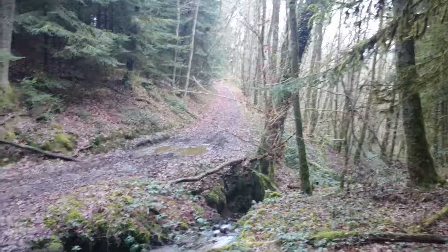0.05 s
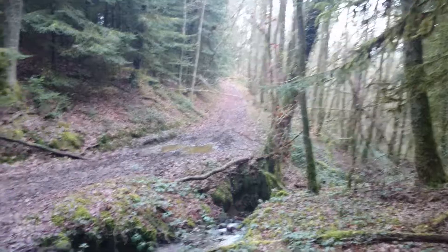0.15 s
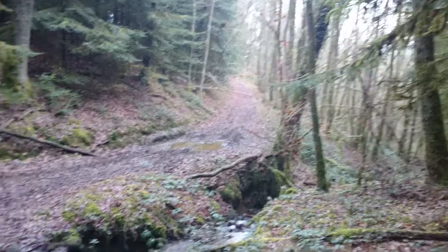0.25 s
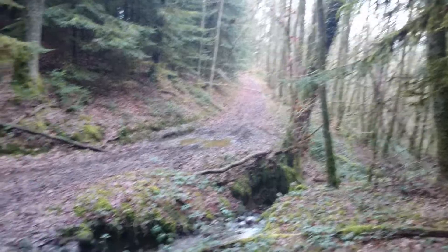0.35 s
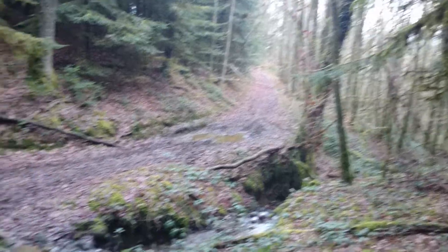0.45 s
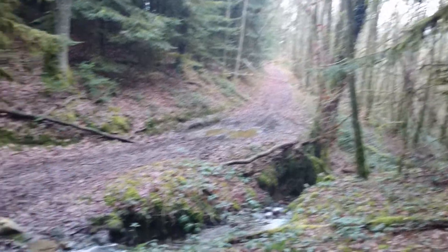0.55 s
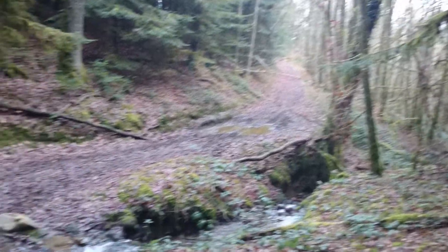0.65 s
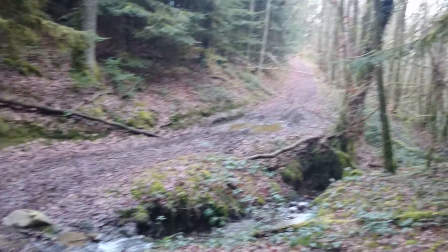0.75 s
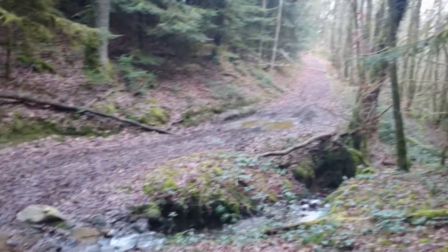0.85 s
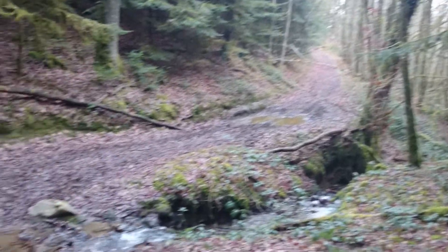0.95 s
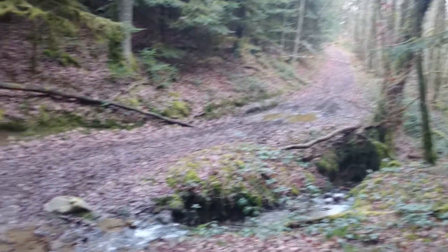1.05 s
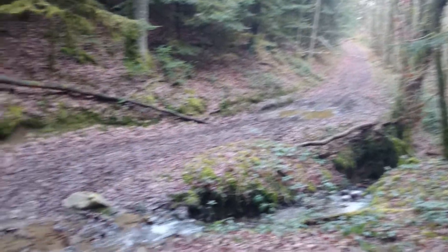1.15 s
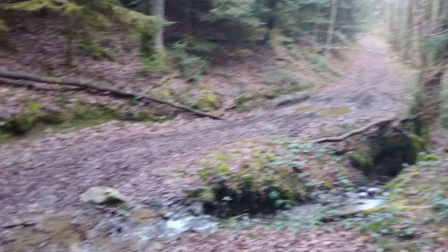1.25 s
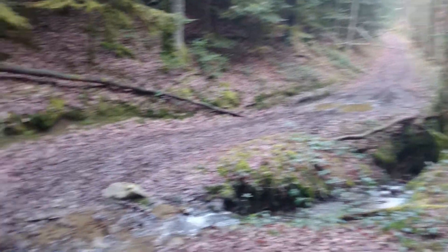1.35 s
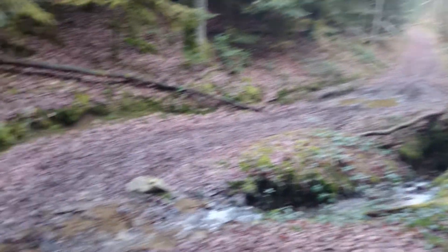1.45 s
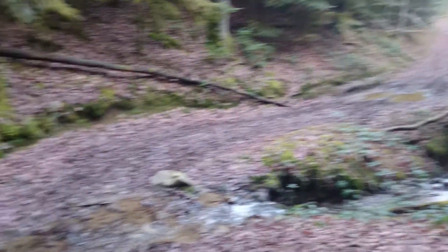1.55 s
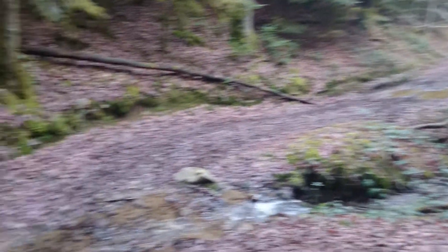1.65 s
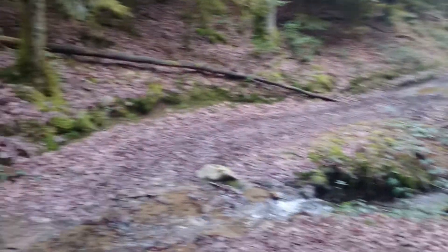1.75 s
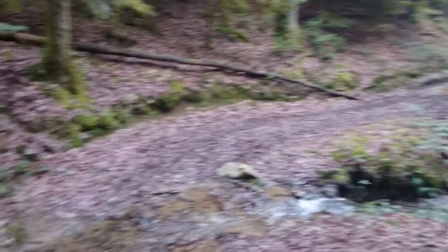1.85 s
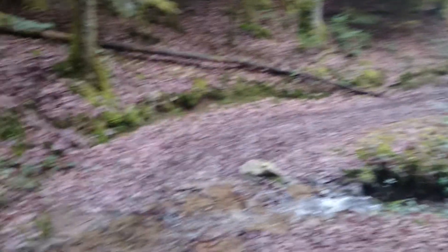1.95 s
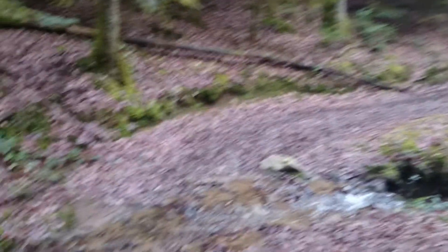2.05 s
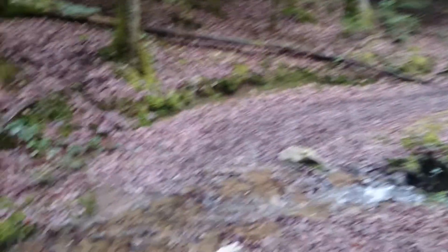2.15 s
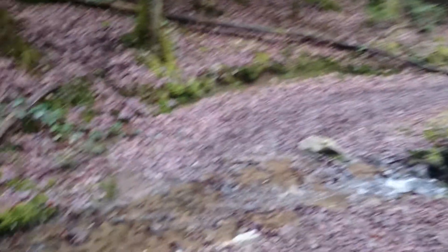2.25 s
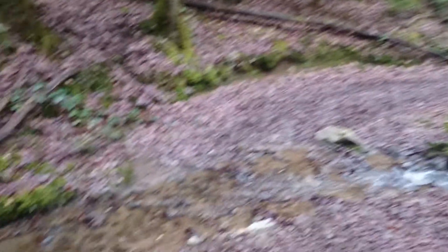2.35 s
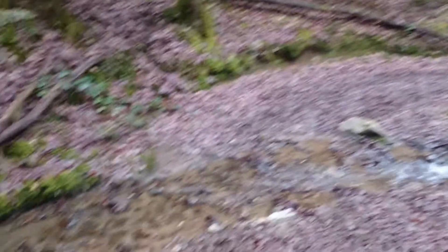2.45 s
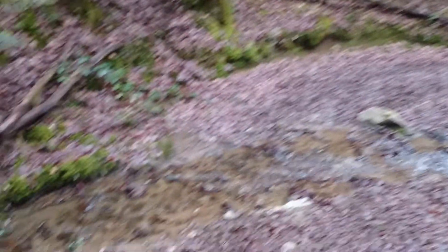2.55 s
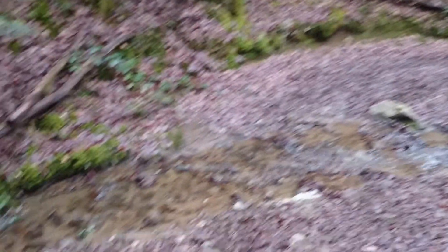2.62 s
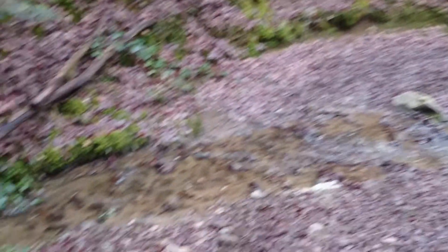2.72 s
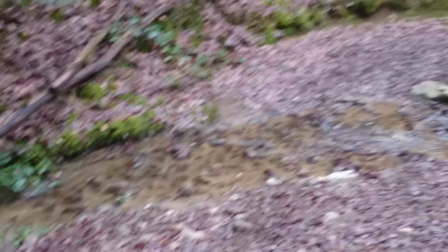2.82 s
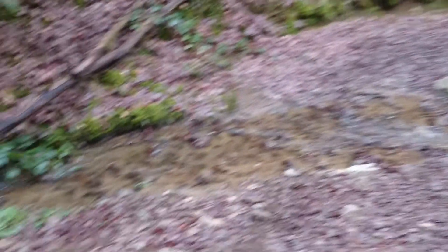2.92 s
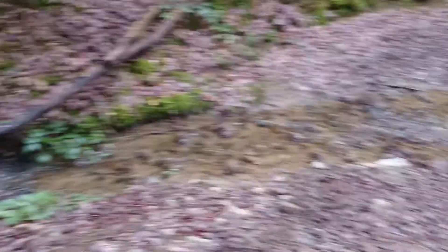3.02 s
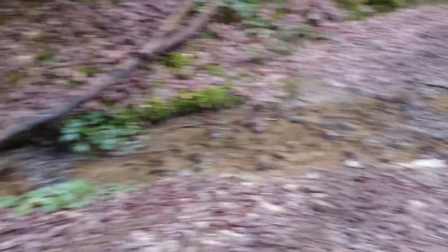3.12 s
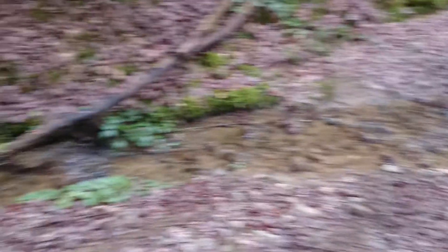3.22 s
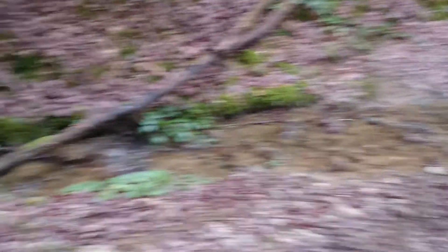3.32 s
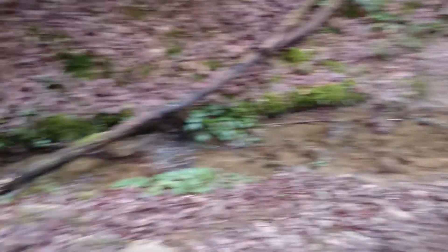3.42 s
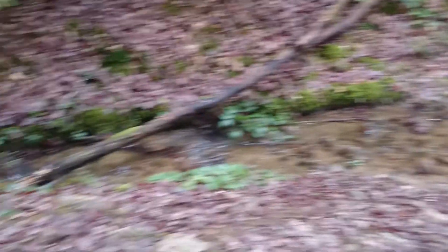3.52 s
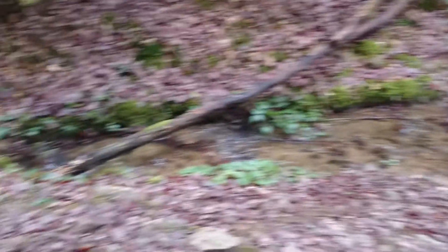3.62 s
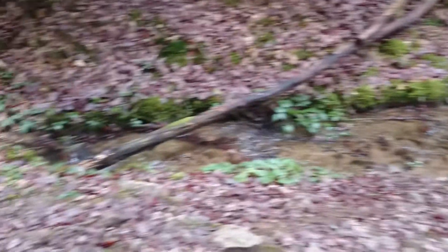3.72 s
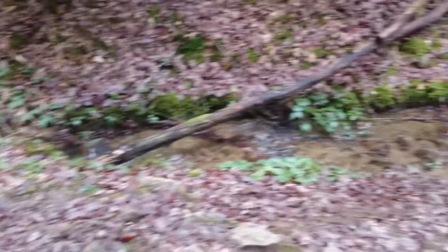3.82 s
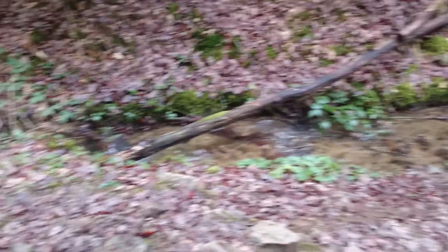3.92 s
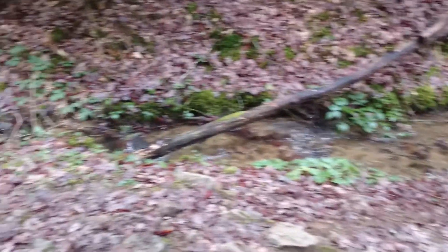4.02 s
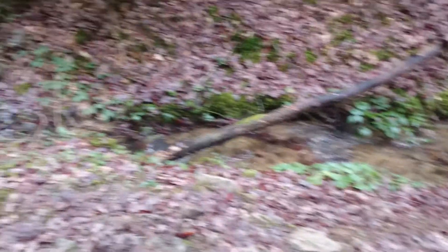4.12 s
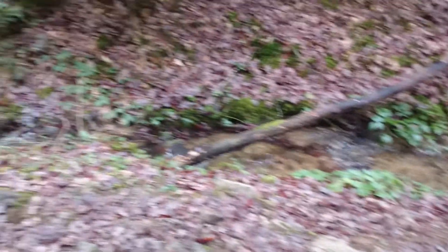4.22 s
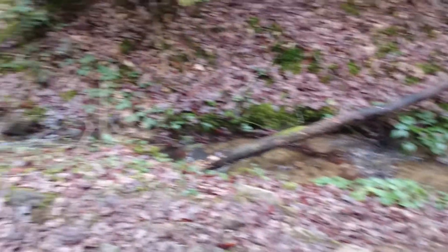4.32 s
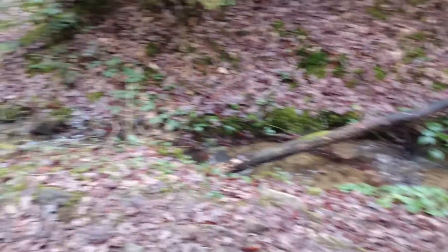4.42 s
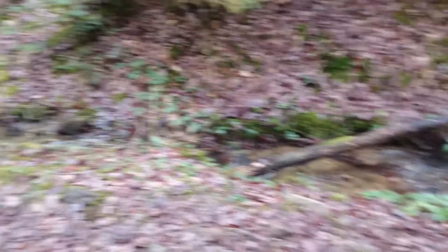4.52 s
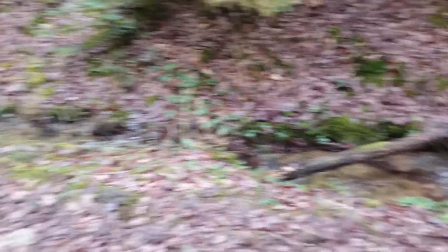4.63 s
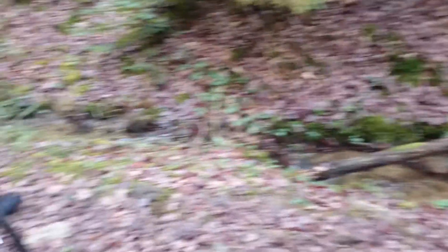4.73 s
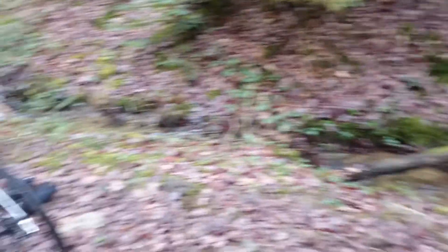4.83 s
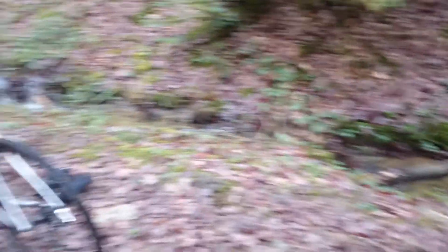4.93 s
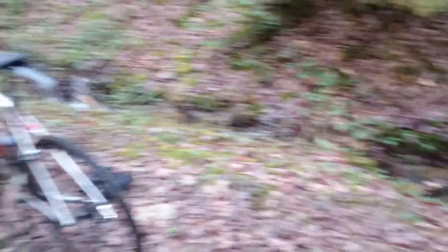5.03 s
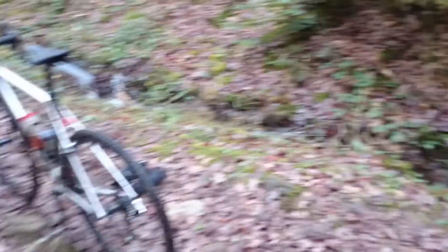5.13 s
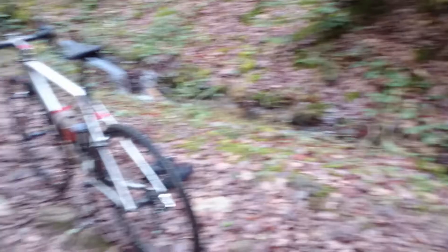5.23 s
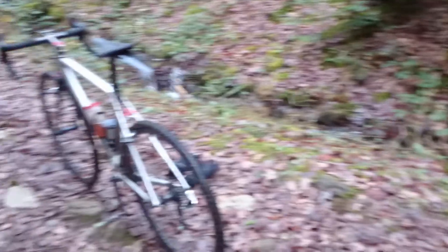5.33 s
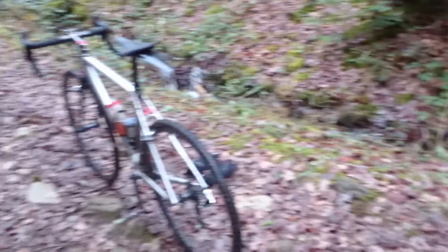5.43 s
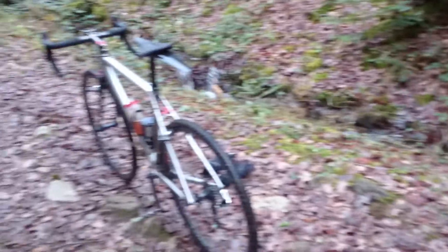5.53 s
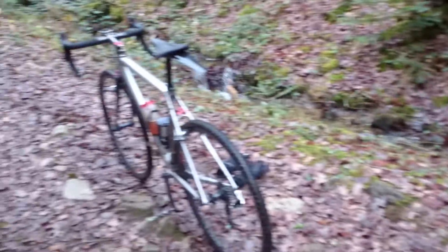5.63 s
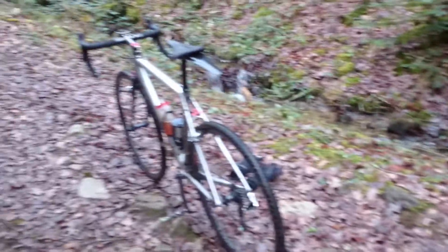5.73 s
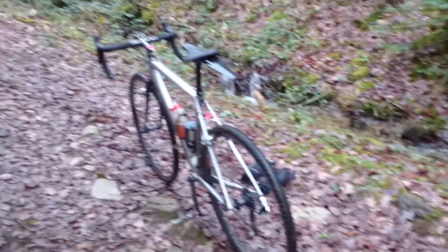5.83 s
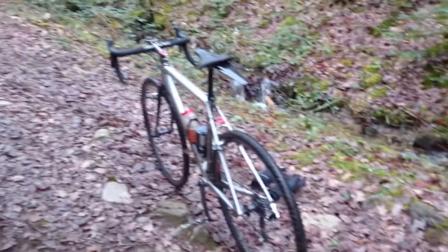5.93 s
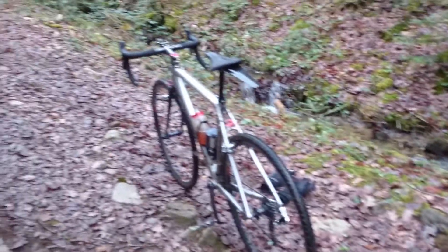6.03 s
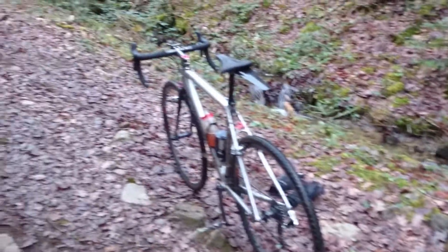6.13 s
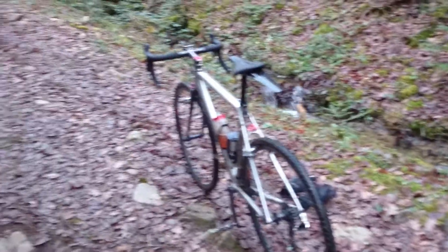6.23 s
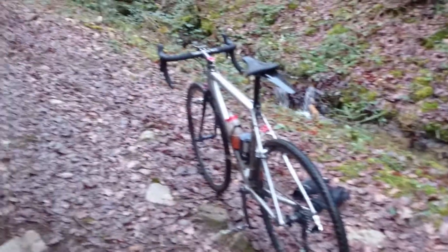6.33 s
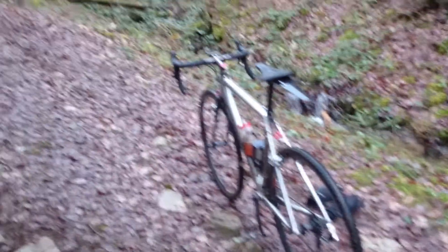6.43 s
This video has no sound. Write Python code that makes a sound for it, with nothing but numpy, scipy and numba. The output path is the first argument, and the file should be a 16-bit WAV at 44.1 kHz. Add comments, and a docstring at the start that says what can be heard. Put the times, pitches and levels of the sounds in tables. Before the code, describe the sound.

A small forest brook starts faint and muffled, suddenly opens up, then splashes and gurgles steadily over stones, close and bright.

```python
"""Forest brook past a turning phone

A small brook runs over stones in a forest, heard at the two ports of a hand-held phone turning slowly left.
Riffles are surging swarms of decaying bubble tones and spray ticks; pool and spout gurgle at their own pitch.
Short bubble clusters make splashes and slaps; long single tones make glugs.
Delayed noise makes a rush from all round. The sound starts faint and opens up after a moment.
"""
import sys
import numpy as np
from scipy import signal
from scipy.fft import rfft, irfft, next_fast_len
from scipy.io import wavfile
from scipy.ndimage import map_coordinates
from numba import njit

SR = 44100
rng = np.random.default_rng(int(sys.argv[2]) if len(sys.argv) > 2 else 0)


def transcribe(u):
    """Save the signal u as a 16-bit wav file named by the first command-line argument.

    u: samples, shape (n,) or (channels, n), limited to [-1, 1]; the rate is SR.
    q: integer samples, one column per channel.
    """
    v = np.clip(np.atleast_2d(u).T, -1, 1)
    q = np.round(v * 32767).astype(np.int16)
    wavfile.write(sys.argv[1], SR, q)


N = 285327
TIME = np.arange(N) / SR
BIN_HZ = np.fft.rfftfreq(next_fast_len(N, True), 1 / SR) + 1  # the 1 Hz offset avoids log of zero

# Riffles, where the water breaks: (bearing to the right [degrees], relative level [dB], tilt [dB per octave])
RIFFLES = [(-2, -5.5, -0.93), (-130, -5, -0.26), (-40, -4, -1)]
# Colour of the water: (frequency [Hz], gain [dB])
WATER_COLOUR = [(25, -32), (55, -21), (130, -13.5), (210, -9), (270, -4.5), (390, -3), (550, 5), (800, 5),
                (1100, 4.5), (1500, -0.9), (2130, -2.15), (2520, -8.5), (4300, -2), (8000, -12),
                (16000, -15)]
# Resonances of the two microphone ports: (frequency [Hz], gain [dB])
LEFT_PORT = [(50, -1), (250, -4), (2000, -11), (2900, -8), (4000, -9), (5100, 5.5), (6100, -1.5),
             (7200, -2.5), (8600, -1.5), (10300, 3), (11300, -2), (12200, -3.5), (13300, -3), (15500, -15)]
RIGHT_PORT = [(50, 8.5), (2000, -1.5), (2900, 0.74), (3600, 3.5), (4200, 3.5), (4550, 2), (5000, -2.5),
              (5700, 3.5), (7400, -1), (9300, -1.5), (11400, -3.5), (12300, -11.5), (13200, 3.5),
              (14500, -8), (15500, 5.5)]
# Loudest splashes: (time [s], relative level [dB], ring [Hz], length [s], pitch spread [share])
SPLASHES = [(.439, 2, 2600, .009, .13), (0.691, 0, 2260, .011, 0.091), (0.723, -4, 1710, 0.012, 0.13),
            (.78, 2, 3280, 0.0073, 0.045), (.838, 5, 4950, .009, 0.088), (.934, 1, 5700, .004, .12),
            (1.346, 3, 3800, 0.0043, .067), (1.5, 1, 5600, 0.0056, 0.089), (1.528, 1, 5510, 0.0082, 0.073),
            (1.555, -0.5, 5960, .015, 0.16), (1.611, -3, 1700, 0.0089, .25),
            (1.847, 8, 5500, 0.0074, 0.086), (2.261, -1, 1400, 0.01, 0.073), (2.471, -1, 4340, .0073, .091),
            (2.616, -3, 4230, .035, 0.16), (2.684, -4, 1580, 0.012, .25), (2.812, -1, 3530, .007, .04),
            (2.847, 2.5, 1580, 0.014, 0.12), (2.877, 4, 1890, 0.009, 0.19), (3.009, 6, 5700, .006, 0.058),
            (3.149, -0.5, 4150, .009, .07), (3.186, 7, 3450, 0.0073, 0.11), (3.395, 8, 5700, 0.0099, 0.041),
            (3.677, 5, 3450, .01, .05), (3.714, 12, 6700, 0.0045, .05), (3.907, 3, 1480, 0.0051, 0.15),
            (4.237, 3, 5640, .007, .03), (4.448, -4, 5340, 0.011, .1), (4.514, 6, 4670, .0079, 0.072),
            (4.775, 6, 4400, 0.013, 0.065), (4.786, 6, 5200, 0.0086, .1), (4.819, -2, 3270, .011, 0.053),
            (4.86, 2.5, 4500, 0.0075, 0.14), (4.986, -1, 6000, 0.0059, .03), (5.037, 1, 6200, .006, .03),
            (5.226, -2, 1200, .011, .15), (5.25, 2.5, 4280, 0.01, .063), (5.296, 0, 4230, .007, 0.076),
            (5.321, -1.5, 4280, .0075, 0.057), (5.405, 0.5, 4860, .008, 0.08),
            (5.427, 4.5, 5680, .011, .08), (5.463, -2, 5170, 0.0066, 0.059), (6.27, 1, 4170, 0.012, 0.076)]
# Hard, dry slaps of single drops: (time [s], relative level [dB], ring [Hz], length [s], pitch spread [share])
SLAPS = [(3.559, 6, 1950, 0.0043, 0.25), (3.623, 9.5, 7900, 0.0049, .3), (4.317, 5.5, 3300, .0034, 0.41),
         (4.384, 4, 9000, 0.0056, .2), (6.039, 8, 9200, 0.0044, 0.2), (6.24, 8, 12500, .0036, .3)]
# Big air pockets that break loose: (time [s], relative level [dB], ring at onset [Hz])
GLUGS = [(.008, 11, 190), (1.372, 3, 566), (2.088, 11, 840), (2.621, 10, 1010), (2.715, 5, 570),
         (2.76, 3, 610), (2.845, 7, 765), (4.285, 4, 730), (4.85, 3, 590), (5.375, -0.5, 613),
         (5.537, 4.5, 616), (5.923, 3, 640), (6.34, 4, 730)]
# Treble of the water: (time [s], level [dB], left minus right [dB]); only departures from the means are used
TREBLE = [(0.8, -37.5, 3), (2.09, -37, 1), (3.25, -37.5, 3), (3.43, -37, 1.5), (4.7, -36.5, 1.5),
          (4.85, -35.5, 4), (5.09, -38, 2.5), (5.21, -37.5, 0.5), (6.4, -38, 0)]
# Burbling of the shallow hollow: (time [s], relative level [dB])
SHALLOW = [(.8, -22), (1.4, -24), (2.8, -15.5), (3.15, -32), (4.1, -24), (4.6, -15.5), (5.1, -20),
           (5.5, -13.5), (5.8, -13.5), (6.4, -16.5)]
# Opening of bass, lower middle, upper middle, treble: (faint gain [dB], rate of sinking while faint [dB/s],
# gain on opening [dB], full gain [dB], settling time [s])
OPENING = [(-29, 27, -12.5, -11.5, 0.36), (-32.5, 32, -22, -10.5, 0.14), (-24, -2, -2, 0.25, .19),
           (-32, 29, -19, -5, .17)]
# Where those bands meet: (frequency [Hz])
OPENING_EDGES_HZ = [380, 1410, 5460]
# Broad peaks and dips gliding through the colour at each port: (time [s], centre [Hz], gain [dB])
LEFT_SWEEP = [(.5, 7400, -3), (1.3, 6900, -1.5), (2.05, 5770, -5.5), (2.55, 5200, 0), (2.95, 6200, 0.5),
              (3.4, 6100, 0.5), (3.9, 6200, -0.5), (4.6, 6200, -0.5), (5.1, 5800, -3), (5.9, 5500, -2.5),
              (6.4, 5500, -3.5)]
RIGHT_SWEEP = [(.42, 3800, 3.5), (.9, 3260, 0.62), (2, 3870, 0.92), (2.8, 4300, 2.9), (3.65, 5000, 1.8),
               (4.4, 5800, 2.3), (4.8, 6500, 1.8), (5.1, 6100, 0.92), (5.5, 5400, 1.3), (6.4, 6000, .5)]
RIGHT_NOTCH = [(.5, 5360, 0.5), (1.6, 5000, -0.8), (2.9, 5630, 0.5), (3.3, 3000, -0.13), (4, 3230, -2.5),
               (4.6, 3600, -0.81), (5.2, 3320, -1), (6.4, 3250, 0)]
# Narrow ring at the right port, clearest at the end of the turn: (time [s], centre [Hz], gain [dB])
RIGHT_RING = [(.5, 4050, 2.5), (1.6, 4050, 2), (2.5, 4200, 0.5), (3.6, 4300, 0), (4.2, 4250, 1),
              (4.8, 4300, 1.5), (5.5, 4320, 3), (6.1, 4200, 4.5)]
# Spectrum of the faint rumble: (frequency [Hz], relative gain [dB])
RUMBLE = [(20, -21), (55, -5), (100, 6.5), (200, 3), (400, 3), (2000, -47)]

# The steady turn to the left, and the drift of the body of the sound over it (left minus right)
TURN_START_S, TURN_END_S, TURN_FROM_DEG, TURN_TO_DEG = 1.34, 5.73, -3.8, 134.5
PAN_FROM_DB, PAN_TO_DB = -0.3, 0.5
PORT_LAG_S = 0.00052  # lag between the ports for a source fully to one side
SWEEP_OCTAVES, RING_OCTAVES = 0.22, 0.017
BROOK_DB, RUSH_DB, RUMBLE_DB = -28.5, 2.5, -76
SPRAY_SWELL = 2.8  # dB of spray per dB of swell in the flow
SPRAY_CEILING_DB = 11  # the spray can only be thrown so hard
# Deep hollow and spout: gain when faced, bearing to the right, loss when directly behind
DEEP_DB, DEEP_DEG, BEHIND_DB = -16, -83, -10
SPOUT_DB, SPOUT_DEG, SPOUT_BEHIND_DB = -14, -10, -44
BODY_DB, BODY_SWING_DB = -0.63, 0.68  # gain with the middle riffle side-on, added gain straight ahead
SPLASH_CYCLES, SPLASH_SPREAD = 25, 0.1  # cycles of ring at the usual pitch spread
OPEN_S, OPEN_RISE_S = 0.3876, 0.0057
TOP_HZ = 15850


def undb(db):
    """Logarithmic level: decibels become an amplitude ratio."""
    return 10 ** (np.asarray(db) / 20)


def unit(x):
    """Power normalization: scale to rms 1."""
    return x / np.sqrt(np.mean(x ** 2))


def curves(table):
    """Linear interpolation: join the columns of a table by straight lines in time."""
    s, *columns = np.transpose(table)
    return [np.interp(TIME, s, column) for column in columns]


def colour(points):
    """Frequency response: interpolate the gain in dB over log frequency."""
    hz, db = np.transpose(points)
    return undb(np.interp(np.log(BIN_HZ), np.log(hz), db))


def shape(x, gain):
    """Linear filtering: multiply the spectrum by a gain for every frequency."""
    size = next_fast_len(N, True)
    return irfft(rfft(x, size) * gain, size)[..., :N]


def below(x, hz):
    """Low-pass filtering: the gain falls smoothly above the given frequency."""
    return shape(x, 1 / (1 + (BIN_HZ / hz) ** 6))


def walk(rate):
    """Random modulation: straight lines join normal values, `rate` of them a second."""
    knots = rng.standard_normal(4096)
    return np.interp(TIME * rate, np.arange(len(knots)), knots) * np.sqrt(3 / 2)  # spread near 1


def heading():
    """Uniform rotation: degrees that the phone has turned to the left."""
    return np.interp(TIME, [TURN_START_S, TURN_END_S], [TURN_FROM_DEG, TURN_TO_DEG])


def facing(bearing, behind_db=BEHIND_DB):
    """Directivity: gain 1 straight ahead, least from behind."""
    return undb(behind_db * (1 - np.cos(np.radians(bearing + heading()))) / 2)


def at_ports(x, bearing):
    """Interaural-type delay: sound from one side reaches the far port a little later."""
    lag = PORT_LAG_S * SR * np.sin(np.radians(bearing + heading()))
    left = map_coordinates(x, [np.arange(N) - lag], order=3)
    return np.array([left, x])


@njit
def ring(start, hz, cycles, size, glide):
    """Damped resonance: each bubble rings down by 40 dB, rising in pitch as it nears the surface."""
    out = np.zeros(N)
    for k in range(len(start)):
        life = cycles[k] * SR / hz[k]  # samples
        step = 2 * np.pi * hz[k] / SR
        pole = np.exp(1j * step - np.log(100.) / life)
        rise = np.exp(1j * step * glide / life)
        z, first = size[k] + 0j, int(start[k] * SR)
        for i in range(max(first, 0), min(first + int(life), N)):
            out[i] += z.imag
            z *= pole
            pole *= rise
    return out


def rush(count=9):
    """Diffuse field: distant water and its bank echoes are independent noises, each with its own port lag."""
    out = 0
    for bearing in np.pi * ((np.arange(count) + 0.5) / count - 0.5):
        hiss = rng.standard_normal(N)
        lag = int(PORT_LAG_S * SR * np.sin(bearing))
        out = out + np.array([np.roll(hiss, lag), hiss])
    return unit(out) * undb(RUSH_DB)


def bubbles(surge_db, count, cycles, scatter_db, low_hz=140, high_hz=14000):
    """Bubble resonance: a random swarm holds more high rings than low ones in each octave."""
    when, place, length, strength = rng.random((count, 4)).T
    low_root, high_root = np.sqrt(low_hz), np.sqrt(min(high_hz, 0.4 * SR))
    hz = (low_root + place * (high_root - low_root)) ** 2
    surge = surge_db[(when * N).astype(int)]
    size = hz ** (3 / 4) * undb(scatter_db * strength ** 2 + surge)
    return unit(ring(when * N / SR, hz, cycles * (0.5 + length), size, 0.1))


def spray(surge_db, count, scatter_db, tick_hz=4200):
    """Impulse excitation: droplets fall back on water and stone as tiny bright ticks."""
    when, strength, sign = rng.random((count, 3)).T
    size = np.sign(sign - 0.5) * undb(-scatter_db * np.log(strength + 0.0055))
    ticks = np.bincount((when * N).astype(int), size, N)
    ticks = ticks * undb(np.minimum(surge_db, SPRAY_CEILING_DB))
    return unit(ticks - below(ticks, tick_hz))


def riffle(bright_db, slow_db=1.9, slosh_db=1.0, burst_db=1.0, spray_db=-2, throw=9.5):
    """Turbulent modulation: water tumbles in uneven swells; quick bursts on them throw up the spray."""
    swell_db = slow_db * walk(9) + slosh_db * walk(35)
    quick_db = burst_db * walk(170)
    froth = bubbles(swell_db + quick_db, count=26000, cycles=30.2, scatter_db=12)
    thrown = spray(SPRAY_SWELL * swell_db + throw * quick_db, count=14000, scatter_db=6.0)
    water = unit(froth + undb(spray_db) * thrown)
    return shape(water, undb(bright_db * np.log2(BIN_HZ / 3000)))


def trickle(count=1100, cycles=85, trickle_db=-13.5):
    """Light damping: thin threads of water at the edge shed fewer, clearer bubbles."""
    swarm = bubbles(np.zeros(N), count, cycles, scatter_db=6.0, low_hz=799.6, high_hz=6505)
    return undb(trickle_db) * swarm


def plops(count=380, cycles=44, plop_db=-14.5):
    """Sparse resonances: middling bubbles pop clear, most plainly while the phone faces the middle riffle."""
    swarm = bubbles(np.zeros(N), count, cycles, scatter_db=4.0, low_hz=646, high_hz=2440)
    return undb(plop_db) * facing(RIFFLES[2][0]) * swarm


def gurgle(count, hollow_hz, spread, cycles, scatter_db=12):
    """Cavity resonance: large bubbles ring around the pitch of the hollow that traps them."""
    when, strength = rng.random((count, 2)).T
    hz = hollow_hz * np.exp(spread * rng.standard_normal(count))
    size = undb(scatter_db * strength)
    return unit(ring(when * N / SR, hz, np.full(count, 1. * cycles), size, 0.077))


def spout():
    """Narrow-band resonance: a gap between stones gurgles brightly and fades as the phone turns away."""
    gap = gurgle(count=800, hollow_hz=2214, spread=0.086, cycles=78, scatter_db=1)
    return undb(SPOUT_DB) * facing(SPOUT_DEG, SPOUT_BEHIND_DB) * gap


def pool():
    """Two cavities: a shallow one burbles in spells; a deep one is loudest when faced."""
    shallow = undb(curves(SHALLOW)[0]) * gurgle(count=650, hollow_hz=628, spread=0.172, cycles=27)
    murmur = gurgle(count=500, hollow_hz=207, spread=0.086, cycles=20)
    return shallow + undb(DEEP_DB) * facing(DEEP_DEG) * murmur


def glugs(cycles=26, glug_db=-5.5):
    """Single-bubble resonance: each large air pocket is one decaying tone with a slight rise in pitch."""
    s, db, hz = np.array(GLUGS).T.copy()
    return ring(s, hz, np.full(len(s), 1. * cycles), undb(db + glug_db), 0.064)


def splash(s, db, hz, length, spread, splash_db=-5.0, scatter_db=8.0, count=24):
    """Clustered resonances: a soft slop rings near one pitch, a hard slap is a wide, dry click."""
    delay, pitch, strength = rng.random((count, 3)).T
    place = 2 * (np.arange(count) + pitch) / count - 1
    pitches = np.minimum(hz * np.exp(2 * spread * place), 0.4 * SR)
    cycles = np.full(count, SPLASH_CYCLES * np.sqrt(SPLASH_SPREAD / spread))
    burst = ring(s + length * delay ** 1.2, pitches, cycles, undb(scatter_db * strength), 0.13)
    # energy in proportion to length
    return burst * undb(db + splash_db) * np.sqrt(length * SR / (burst @ burst + 1e-18))


def small_slops(count=16, slop_db=-10, scatter_db=2, low_hz=1100, high_hz=6500, length_s=0.012, spread=0.1):
    """Random arrivals: lesser splashes at random times and pitches, as rows like those of the loud ones."""
    when, strength, pitch = rng.random((count, 3)).T
    level_db = slop_db + scatter_db * (2 * strength - 1)
    hz = low_hz * (high_hz / low_hz) ** pitch
    return np.column_stack([when * N / SR, level_db, hz, np.full(count, length_s), np.full(count, spread)])


def splashes():
    """Superposition: the loud splashes and the lesser ones add."""
    return sum(splash(*row) for row in np.vstack([small_slops(), SPLASHES]))


def slaps():
    """Zero path difference: drops land hard in front of the phone and reach both ports together."""
    return sum(splash(*row) for row in SLAPS)


def scene():
    """Superposition: all the water sounds add, and one frequency response gives the colour of the water."""
    water = rush()
    for bearing, db, bright_db in RIFFLES:
        water = water + undb(db) * at_ports(riffle(bright_db), bearing)
    treble_db = curves(TREBLE)[0]
    body = below(water, hz=2780)
    body_db = BODY_DB + BODY_SWING_DB * np.cos(np.radians(RIFFLES[2][0] + heading()))
    water = body * undb(body_db) + (water - body) * undb(treble_db - treble_db.mean())
    from_first = at_ports(trickle() + spout() + splashes(), RIFFLES[0][0])
    from_second = at_ports(pool() + plops() + glugs(), RIFFLES[1][0])
    water = water + slaps() + from_first + from_second
    return shape(water, colour(WATER_COLOUR)) * undb(BROOK_DB)


def sweep(x, tables, size=1024):
    """Time-varying filtering: peaks and dips, each of its own width in octaves, glide through one port."""
    hz, s, frames = signal.stft(x, SR, nperseg=size)
    gain_db = 0
    for table, width in tables:
        when, centre_hz, db = np.transpose(table)
        octaves = np.log2((hz[:, None] + 1) / np.interp(s, when, centre_hz))
        gain_db = gain_db + np.interp(s, when, db) * np.exp(-0.5 * (octaves / width) ** 2)
    return signal.istft(frames * undb(gain_db), SR, nperseg=size)[1][:N]


def ports(dry, split_hz=4600):
    """Port resonance: each port has its own colour; body balance follows the turn, treble balance its table."""
    left, right = shape(dry, np.array([colour(LEFT_PORT), colour(RIGHT_PORT)]))
    left = sweep(left, [(LEFT_SWEEP, SWEEP_OCTAVES)])
    right = sweep(right, [(RIGHT_SWEEP, SWEEP_OCTAVES), (RIGHT_NOTCH, SWEEP_OCTAVES),
                          (RIGHT_RING, RING_OCTAVES)])
    x = np.array([left, right])
    body, sides = below(x, hz=split_hz), np.array([[1], [-1]]) / 2
    body_pan_db = np.interp(TIME, [TURN_START_S, TURN_END_S], [PAN_FROM_DB, PAN_TO_DB])
    treble_pan_db = curves(TREBLE)[1]
    treble_pan_db = treble_pan_db - treble_pan_db.mean()
    return body * undb(sides * body_pan_db) + (x - body) * undb(sides * treble_pan_db)


def opening(faint_db, sink_db_per_s, open_db, full_db, settle_s):
    """Exponential settling: one band's gain is faint, jumps quickly, then slowly approaches its full value."""
    since = np.maximum(TIME - OPEN_S, 0)
    opened = np.minimum(since / OPEN_RISE_S, 1)
    faint = undb(faint_db - sink_db_per_s * TIME)
    full = undb(full_db + (open_db - full_db) * np.exp(-since / settle_s))
    return (1 - opened) * faint + opened * full


def rumble():
    """Uncorrelated noise: a faint low rumble, independent at the two ports."""
    return undb(RUMBLE_DB) * unit(shape(rng.standard_normal((2, N)), colour(RUMBLE)))


def record(dry):
    """Band splitting: the port signals open up band by band, rumble joins, and a low-pass cuts the top."""
    x = ports(dry)
    edges = [below(x, hz=edge) for edge in OPENING_EDGES_HZ]
    bands = np.diff([0 * x, *edges, x], axis=0)
    x = sum(band * opening(*row) for band, row in zip(bands, OPENING))
    x = x + rumble()
    return signal.sosfilt(signal.ellip(10, 0.2, 70, TOP_HZ, fs=SR, output="sos"), x)


dry = scene()
out = record(dry)
transcribe(out)
```